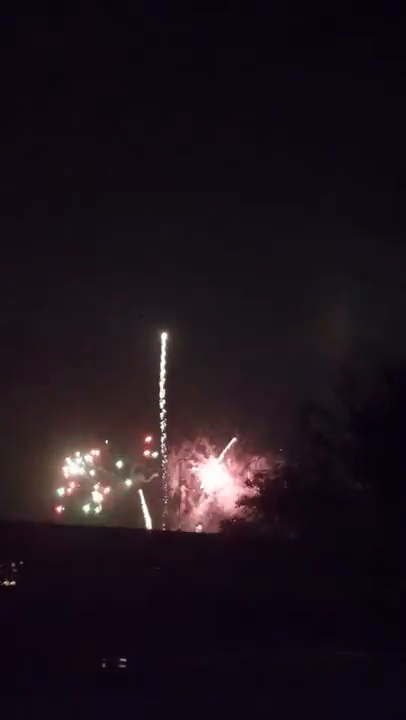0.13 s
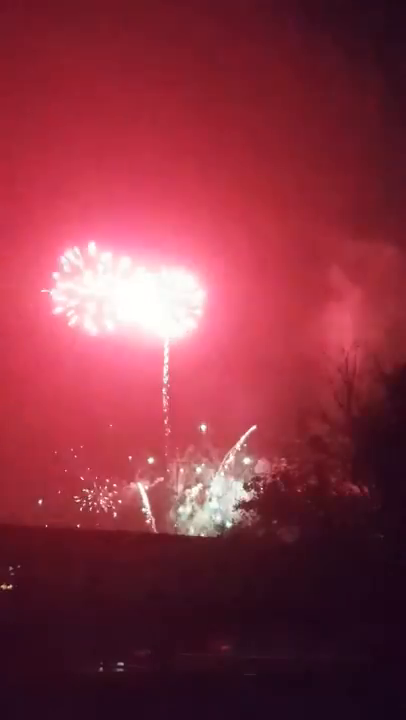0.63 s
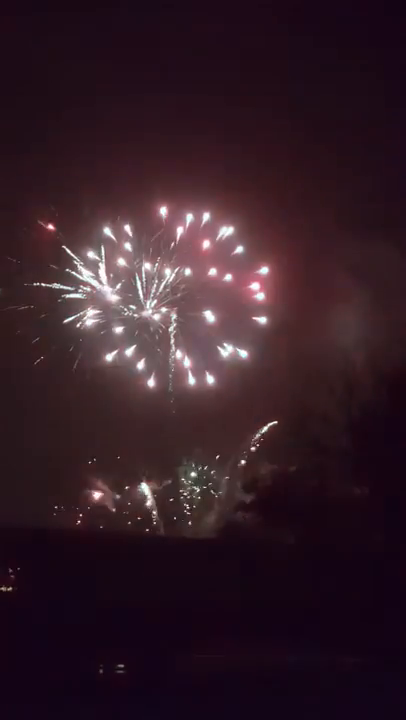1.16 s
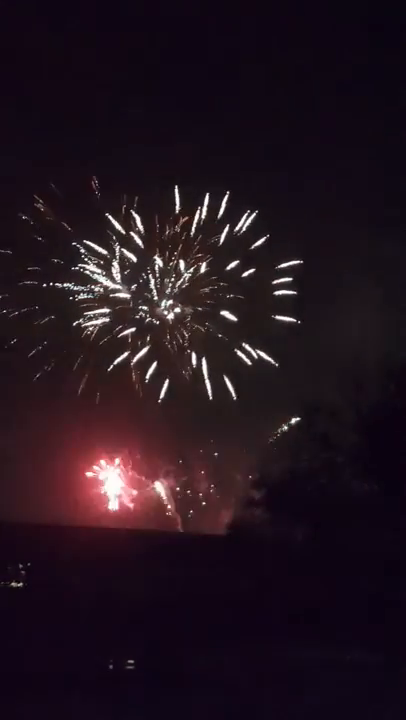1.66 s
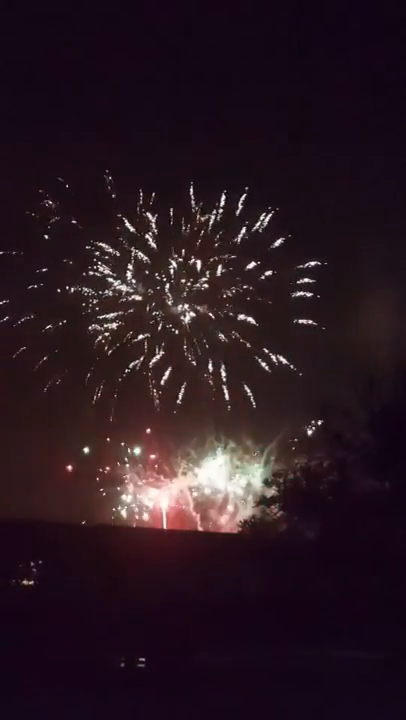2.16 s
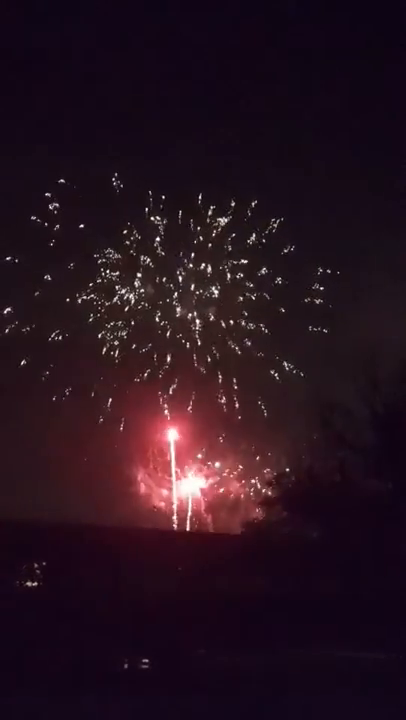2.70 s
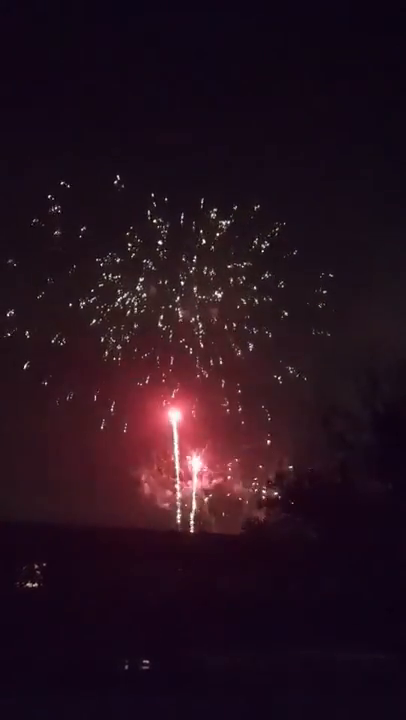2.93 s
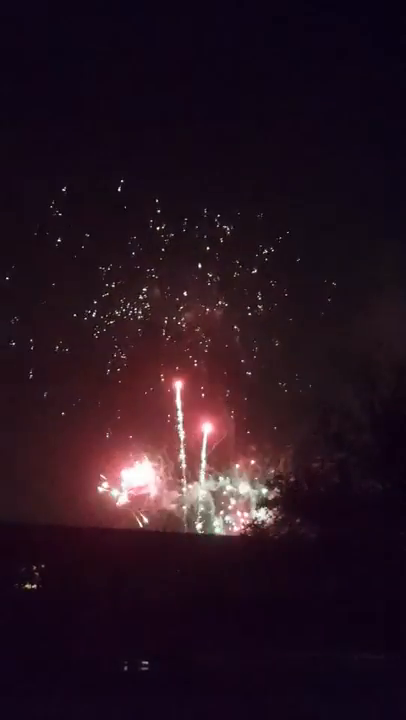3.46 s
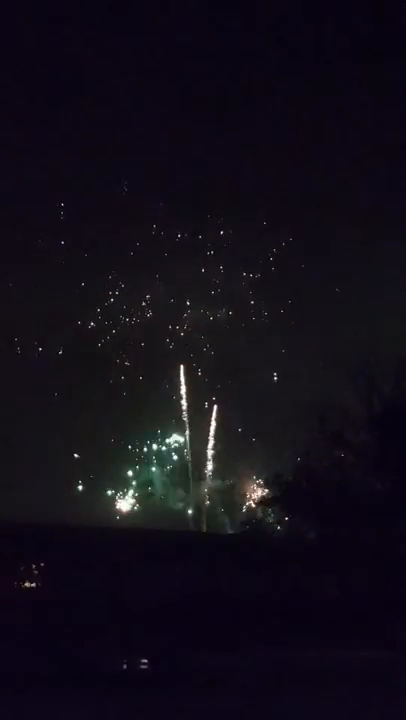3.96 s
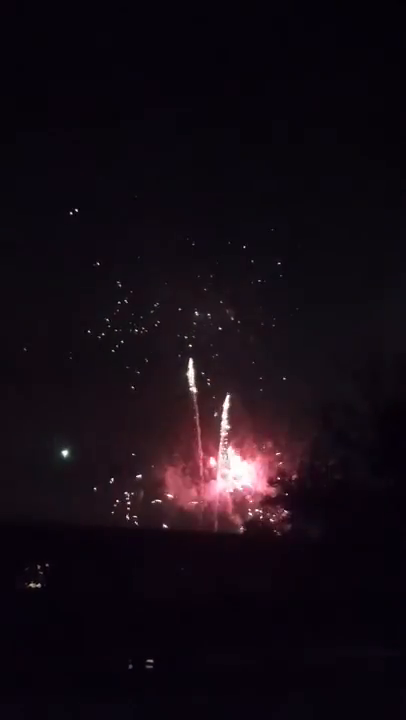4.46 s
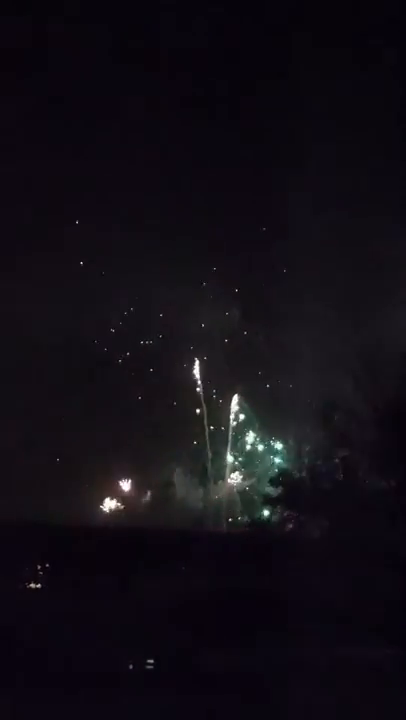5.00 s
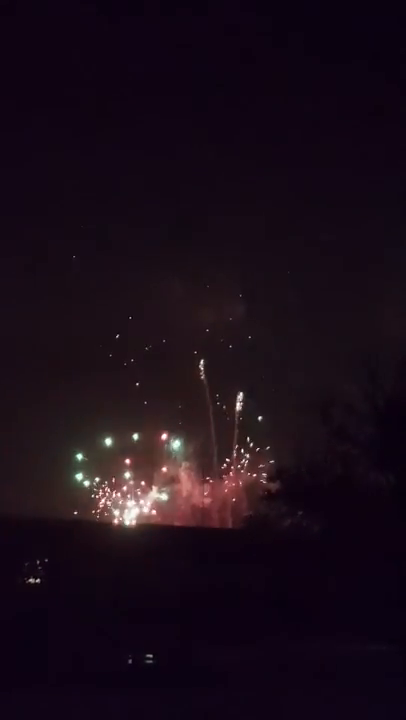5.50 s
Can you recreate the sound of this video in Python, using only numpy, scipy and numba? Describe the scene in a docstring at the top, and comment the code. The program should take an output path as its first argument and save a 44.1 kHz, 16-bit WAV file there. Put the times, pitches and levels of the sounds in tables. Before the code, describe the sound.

Firework shells burst a few hundred metres away in an open night place. The tail of one bang opens; single cracks follow at 0.9 and 1.3 seconds, then a thick, thumping volley near 1.7. Weaker bangs come near 2.7 and 3.0, a strong pair at 4.3 and 4.4, and a last at 5.5. Echoes slap back and roll off over soft rumble. Stereo phone pickup, thin in deep bass, loud peaks held down.

```python
"""An open place at night, firework shells bursting a few hundred metres away, heard on a phone's two microphones.
Each blast is a sudden push and suction, direct and off the ground; walls return it as clusters of copies,
and trees, houses and hills as a long grainy roll of shaped noise. Far bursts rumble on as low banded noise,
insects trill as a narrow throbbing hiss, small ticks are bandpassed noise, and soft thumps are swelling sines.
Slow gain control and a limiter hold the loudest blasts."""
import sys
import numpy as np
from scipy import signal
from scipy.fft import rfft, irfft
from scipy.io import wavfile
from scipy.ndimage import uniform_filter1d, minimum_filter1d
from numba import njit

SR = 44100
rng = np.random.default_rng(int(sys.argv[2]) if len(sys.argv) > 2 else 0)


def dump(signal):
    """Clip the signal to [-1, 1] and save it as 16-bit WAV at the path in sys.argv[1]."""
    limited = np.clip(np.atleast_2d(signal).T, -1, 1)
    pcm = np.round(limited * 32767).astype(np.int16)
    wavfile.write(sys.argv[1], SR, pcm)


def to_linear_factor(level_db):
    """Convert decibel levels (scalar or array-like) to linear amplitude factors."""
    exponent = np.asarray(level_db, float) / 20
    return 10 ** exponent


N = 247842  # samples

# All levels in the tables are as set ahead of the microphones.
# Far bursts. Each row: time in seconds, level in dB; the level glides from row to row.
FAR_BURSTS = [(0, -42), (.25, -60), (.89, -62.5), (1.3, -45), (1.89, -50.5), (2.2, -60.5), (2.74, -55),
              (2.95, -46.5), (3.35, -45), (3.55, -47.5), (3.72, -55), (4.3, -54), (4.5, -33), (4.7, -43.5),
              (5.07, -53.5), (5.62, -56.5)]
# Colour of the far rumble. Each row: frequency in Hz, level in dB per Hz.
FAR_COLOUR = [(25, 25), (60, 17), (125, 6), (250, 5.5), (500, -2.5), (1000, -11), (2000, -20), (3200, -31),
              (5000, -42), (8000, -54.5), (15500, -64)]
# Small ticks and rustles close by. Each row: start in seconds, level in dB, centre in Hz,
# length in ms (the swell is fullest at half of it), left minus right in dB.
TICKS = [(0.717, -62, 3000, 13, 7), (4.185, -50.5, 3820, 71, 8), (4.227, -49.5, 9700, 0.87, 0),
         (4.239, -28.5, 2370, 2.3, -6), (4.238, -55, 9800, 4.5, 4), (5.299, -52, 2480, 24, 6)]
# Deep soft thumps in the roll. Each row: start in seconds, peak in dB, pitch in Hz, rise to the peak in ms.
THUMPS = [(1.683, -16, 167, 9.3), (1.718, -11, 303, 14), (1.745, -9.5, 251.3, 17),
          (1.80, -8.5, 138.7, 22.4), (4.62, -16.5, 70, 33)]
# Firework bursts. Each row: start in seconds, direct peak in dB, push length in ms, extra delay of the
# wall echoes in ms, gain of the near wall echoes in dB, gain of the roll and the far walls in dB.
BURSTS = [(-.09, -3, 1.1, 0, -8, 0), (.8946, -5.2, 1.5, -1, 5, 1), (1.2867, .5, 1.4, -2.5, 3, 1),
          (1.6736, 3, 1.4, -2, 5, 1), (1.6796, 3, 1.6, -1, 10, 1), (1.7143, 7, .75, 0, -5, 0),
          (1.6895, 0, 6, 0, -8, -2), (1.7020, 4, 7, 0, -8, -3), (1.7245, 3, 2.2, 0, -6, 0),
          (1.7589, 1, .55, 0, -8, -5), (2.7289, -4, 1.2, 1.5, 0, 0), (3.0297, -3.5, 1.3, 1.5, -3, 1),
          (3.5185, -23, 3, 0, 0, 8), (4.2857, 3.5, 1.6, .5, 1, 1), (4.4416, 2.5, 1.0, 0, -2, -1),
          (5.5451, 1.5, 1.4, 0, -3, 1)]
# Ground bounce, one row for the left microphone and one for the right.
# Each row: delay after the direct wave in ms, level against it in dB.
GROUND_BOUNCE = [(.33, -11), (.45, -14)]
# Hard walls that return every blast. Each row: delay in ms, level in dB, smear (decay time) in ms,
# lag of the left microphone in samples (negative: the right lags), top frequency in Hz.
WALLS = [(33.34, -24, 3.2, 13.5, 4100), (65.1, -14.5, 3.5, -6.5, 4100), (70.9, -21.5, 6.7, -5, 1020),
         (92, -23.5, 16.4, -2, 4300), (214.4, -29.5, 2.9, -13.5, 3500), (236, -26, 3.1, -2.5, 4000),
         (366, -35, 11, 5, 1460)]
# The place's answer to a blast: nearby things, the street, a row of trees and houses, the far hills.
# Each row: start in seconds, rise in seconds, level in dB, fade in dB per second,
# brightness in dB per octave, dulling in dB per octave and second.
SCATTER = [(0.00063, 0.00067, -32.5, 804, 3, 14), (0, 0.0029, -35.5, 97, 0.32, 20.5),
           (0.041, 0.045, -35.5, 76.5, 1.5, 16.5), (0.012, 0.044, -53.5, 21, 0.5, 4)]
# What the place returns best. Each row: frequency in Hz, gain in dB.
PLACE_COLOUR = [(60, -2.5), (110, -4.5), (160, -0.2), (230, -1.7), (350, 2.5), (550, -3.16), (1000, -0.4),
                (1600, 2.5), (2500, 1.94)]
# Likeness of left and right in diffuse sound. Each row: frequency in Hz, correlation (no unit).
LIKENESS = [(60, 0.92), (300, 0.98), (600, 0.76), (1200, 0.77), (2500, -0.23), (8000, -0.14)]
# Colour of the microphones. Each row: frequency in Hz, gain in dB.
MIC_COLOUR = [(1000, 0), (2000, 0), (3000, .4), (5000, -1.4), (7500, -2.4), (10500, 1.4), (13000, -1.4),
              (15500, -4)]

OCTAVES = 40 * 2. ** np.arange(9)  # band centres, Hz
SIDES = np.array([[1], [-1]])  # left, right
OCTAVES_UP = np.log2(np.maximum(OCTAVES / 320, 1))  # octaves above 320 Hz

DEEP_DB = -47  # base level of the two deepest octaves of the rumble
RUMBLE_BRIGHT_DB = 2.73  # per octave above 320 Hz
INSECT_HZ, INSECT_WIDTH_HZ, INSECT_DB = 6880, 780, -73
INSECT_RATE_HZ = 8.5  # mean rate of the throb
BLAST_DECAY = .55  # per push length
FRONT_SHARE = 0.24  # the front rounds off at one cycle per this share of the push
WHOLE_PUSH_HZ = 1050  # a wall with this top returns the whole push, a brighter one a shorter push
NEAR_WALL_MS = 80  # walls sooner than this count as near
FACET_DB = -14  # the small facets of a wall against its flat face
ROLL_S = 1.5  # length of the roll
BASS_CUT_HZ, BASS_CUT_Q = 204, 1.
LEFT_DB, HISS_DB = 1.3, -84  # left minus right; microphone hiss ahead of the gain control
DUCK_ABOVE_DB, DUCK_SHARE = -22, 1  # threshold; dB turned down per dB above it
DUCK_LISTEN_S, DUCK_RELEASE_S = .3, 1.0
CEILING_DB, LOOK_MS, RELEASE_MS = -.3, 2, 18  # limiter


def on_log(hz, table):
    """Read a (Hz, value) table on a log-frequency axis."""
    f, v = np.transpose(table)
    return np.interp(np.log(np.maximum(hz, 1)), np.log(f), v)


def causal(table, size=4096):
    """Minimum-phase response with the colour of a (Hz, dB) table."""
    hz = np.arange(size // 2 + 1) * SR / size
    cepstrum = irfft(np.log(to_linear_factor(on_log(hz, table))))
    # folding the cepstrum forward puts the energy as early as possible
    cepstrum[1:size // 2] *= 2
    cepstrum[size // 2 + 1:] = 0
    return irfft(np.exp(rfft(cepstrum)))


def octaves(x):
    """Split into overlapping octave bands that sum to the input."""
    hz = np.arange(x.shape[-1] // 2 + 1) * SR / x.shape[-1]
    distance = np.log2(np.clip(hz, OCTAVES[0], OCTAVES[-1]) / OCTAVES[:, None])
    weight = np.clip(1 - abs(distance), 0, 1)
    return irfft(rfft(x)[None] * weight[:, None], x.shape[-1])


def stereo_bands(mid_side):
    """Octave bands of two unrelated noises, mixed so that the bass is alike left and right."""
    like = np.clip(on_log(OCTAVES, LIKENESS), -1, 1)[:, None, None]
    bands = octaves(mid_side)
    middle = bands[:, :1] * np.sqrt((1 + like) / 2)
    side = bands[:, 1:] * np.sqrt((1 - like) / 2)
    return middle + SIDES * side


def walk(rate):
    """Random levels held 1 / rate s and slewed twice."""
    hold = int(SR / rate)
    steps = np.repeat(rng.standard_normal(N // hold + 1), hold)
    return uniform_filter1d(uniform_filter1d(steps, hold), hold)[:N]


def add(out, s, sound):
    """Mix a sound in at s seconds; what falls outside the scene is cut off."""
    i = int(s * SR)
    part = sound[:, max(-i, 0):max(N - i, 0)]
    out[:, max(i, 0):max(i, 0) + part.shape[1]] += part


def rumble():
    """Far bursts melt into a low roll whose bands swell together and flicker alone."""
    hz = np.arange(N // 2 + 1) * SR / N
    spectrum = rfft(rng.standard_normal((2, N))) * to_linear_factor(on_log(hz, FAR_COLOUR))
    bands = stereo_bands(irfft(spectrum, N))
    level = np.interp(np.arange(N) / SR, *np.transpose(FAR_BURSTS))
    together = 1.7 * walk(14)
    alone = np.array([0.31 * walk(3.82) for _ in OCTAVES])
    db = level + together + alone + RUMBLE_BRIGHT_DB * OCTAVES_UP[:, None]
    # the deepest octaves do not follow the bursts
    db[:2] += DEEP_DB - level
    return np.einsum("bcn,bn->cn", bands, to_linear_factor(db)) / bands[3].std()  # against the 320 Hz octave


def insects():
    """A high narrow trill of many wings, made of hiss that throbs unevenly."""
    edges = INSECT_HZ + INSECT_WIDTH_HZ * np.array([-.5, .5])
    band = signal.butter(2, edges, "bandpass", fs=SR, output="sos")
    hiss = signal.sosfilt(band, rng.standard_normal((2, N)))
    rate = INSECT_RATE_HZ * (1 + .3 * walk(3))
    throb_db = 2.4 * np.sin(2 * np.pi * np.cumsum(rate) / SR) + 1.5 * walk(6)
    return hiss / hiss.std() * to_linear_factor(INSECT_DB + throb_db)


def ticks():
    """Small things close by: short scratchy noises, each in one broad resonance."""
    out, n = np.zeros((2, N)), np.arange(4000)
    for t, db, hz, ms, pan_db in TICKS:
        band = signal.butter(2, [hz / 1.4, hz * 1.4], "bandpass", fs=SR, output="sos")
        swell = n / (ms * SR / 2000)
        noise = rng.standard_normal((2, len(n)))
        scratch = signal.sosfilt(band, noise * swell * np.exp(1 - swell))
        add(out, t, scratch * to_linear_factor(db + pan_db * SIDES / 2))
    return out


def thumps():
    """Soft low sines that swell and die away, alike at both microphones."""
    out, s = np.zeros((2, N)), np.arange(SR // 2) / SR
    for t, db, hz, ms in THUMPS:
        x = s * 1000 / ms
        swell = np.e * x * np.exp(-x)
        thump = swell * np.sin(2 * np.pi * hz * s)
        add(out, t, to_linear_factor(db) * np.tile(thump, (2, 1)))
    return out


def blast(push_ms, lag, top_hz, order):
    """Sudden overpressure that falls through zero into suction; the air rounds its front."""
    late = np.clip(lag * SIDES, 0, None)
    x = (np.arange(2000) - late) / (SR * push_ms / 1000)
    wave = np.where(x >= 0, (1 - x) * np.exp(-BLAST_DECAY * abs(x)), 0)
    wave = signal.sosfilt(signal.butter(order, top_hz, fs=SR, output="sos"), wave)
    return wave / abs(wave).max()


def echoes():
    """Each uneven wall returns each blast as a short cluster of copies, from one side."""
    out, n = np.zeros((2, N)), np.arange(3000)
    for t, db, push_ms, later_ms, near_db, far_db in BURSTS:
        for ms, wall_db, smear_ms, lag, top_hz in WALLS:
            specks = rng.standard_normal(len(n))
            facets = to_linear_factor(FACET_DB) * specks * np.exp(-n / (smear_ms * SR / 1000))
            facets[0] = 1  # the flat face
            echo_db = near_db if ms < NEAR_WALL_MS else far_db
            wave = blast(push_ms * WHOLE_PUSH_HZ / top_hz, lag, top_hz, order=4)
            echo = signal.fftconvolve(facets[None], wave, axes=1)
            add(out, t + (ms + later_ms) / 1000, to_linear_factor(db + echo_db + wall_db) * echo)
    return out


def roll_shape(delay):
    """Scattered sound builds up, fades and dulls: its gain in each octave against delay."""
    power, octave = 0, OCTAVES_UP[:, None]
    for start, rise, db, fade_db, bright_db, dull_db in SCATTER:
        since = np.maximum(delay - start, 0)
        tilt_db = (bright_db - dull_db * since) * octave
        gain = (1 - np.exp(-since / rise)) * to_linear_factor(db - fade_db * since + tilt_db)
        power = power + gain ** 2
    return np.sqrt(power)


def roll_bands():
    """Octave bands of grainy, lumpy noise, as scattered back by the place."""
    # scatterers of very uneven size make the roll grainy
    specks = rng.standard_normal((2, N)) * to_linear_factor(2.1 * rng.exponential(size=N))
    grain = signal.fftconvolve(specks / specks.std(), causal(PLACE_COLOUR)[None], axes=1)[:, :N]
    # they stand in clumps, so it comes in lumps
    shared = 2.5 * walk(70)
    alone = np.array([min(f / 300, 3.5) * walk(f / 30 + 20) for f in OCTAVES])
    return stereo_bands(grain) * to_linear_factor(shared + alone)[:, None]


def bangs():
    """Each blast: direct, off the ground, and scattered back by the whole place."""
    out, delay = np.zeros((2, N)), np.arange(int(ROLL_S * SR)) / SR
    bands, gain = roll_bands(), roll_shape(delay)
    for t, db, push_ms, _, _, roll_db in BURSTS:
        i = int(rng.random() * (N - len(delay)))  # a random stretch of the noise for each blast
        response = np.einsum("bcn,bn->cn", bands[:, :, i:i + len(delay)], gain) * to_linear_factor(roll_db)
        response[:, 0] += 1  # direct
        for side, (ms, ground_db) in enumerate(GROUND_BOUNCE):
            response[side, int(ms * SR / 1000)] += to_linear_factor(ground_db)
        wave = blast(push_ms, 0, 1000 / (FRONT_SHARE * push_ms), order=2)
        add(out, t, to_linear_factor(db) * signal.fftconvolve(response, wave, axes=1))
    return out


def scene():
    """Everything that reaches the phone."""
    return rumble() + insects() + ticks() + thumps() + echoes() + bangs()


@njit
def recover(gain, release):
    """Gain drops at once and climbs back slowly."""
    out, g = np.empty(len(gain)), 1.
    for i in range(len(gain)):
        g = min(gain[i], g + (1 - g) * release)
        out[i] = g
    return out


def microphones(x):
    """Small microphones lose the deep bass, colour the sound and hiss a little."""
    g = np.tan(np.pi * BASS_CUT_HZ / SR)
    poles = [1 + g / BASS_CUT_Q + g * g, 2 * g * g - 2, 1 - g / BASS_CUT_Q + g * g]
    x = signal.lfilter([1, -2, 1], poles, x)
    x = signal.fftconvolve(x, causal(MIC_COLOUR)[None], axes=1)[:, :N]
    return x * to_linear_factor(LEFT_DB * SIDES / 2) + to_linear_factor(HISS_DB) * rng.standard_normal((2, N))


def duck(x):
    """Slow gain control: sustained loudness turns the gain down, and it creeps back."""
    keep = np.exp(-1 / (DUCK_LISTEN_S * SR))
    power = signal.lfilter([1 - keep], [1, -keep], (x ** 2).mean(axis=0))
    over_db = np.maximum(10 * np.log10(power + 1e-12) - DUCK_ABOVE_DB, 0)
    return x * recover(to_linear_factor(-DUCK_SHARE * over_db), 1 / (DUCK_RELEASE_S * SR))


def limit(x):
    """Limiter: looks a little ahead, lowers the gain for peaks above the ceiling, then recovers."""
    look = int(LOOK_MS * SR / 1000)
    need = np.minimum(1, to_linear_factor(CEILING_DB) / (abs(x).max(axis=0) + 1e-9))
    gain = recover(minimum_filter1d(need, 2 * look + 1), 1000 / (RELEASE_MS * SR))
    return x * uniform_filter1d(gain, look)


def band_limit(x):
    """A steep low-pass at the top of the band."""
    return signal.sosfilt(signal.butter(12, 15720, fs=SR, output="sos"), x)


def record(dry):
    """The phone: two small microphones, slow gain control, then the limiter."""
    mix = limit(duck(microphones(dry)))
    return band_limit(mix)


dry = scene()
out = record(dry)
dump(out)
```